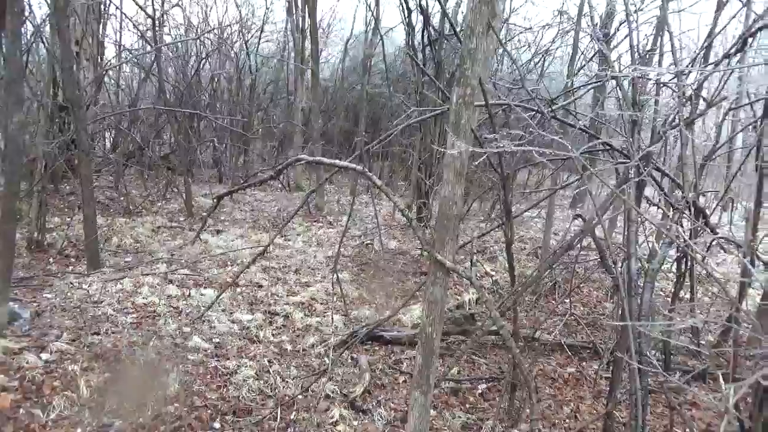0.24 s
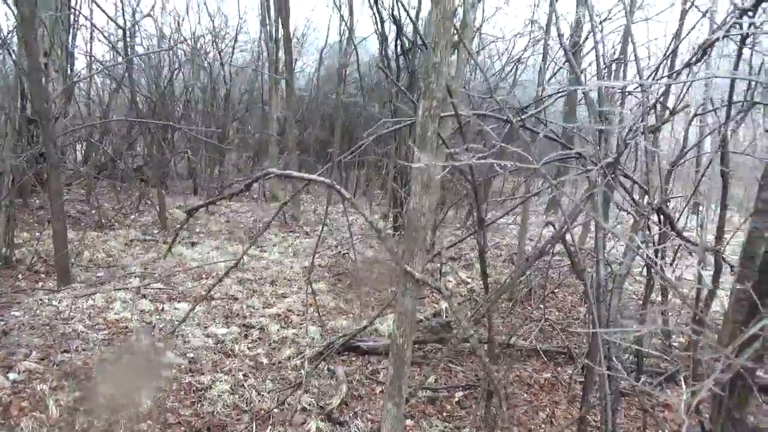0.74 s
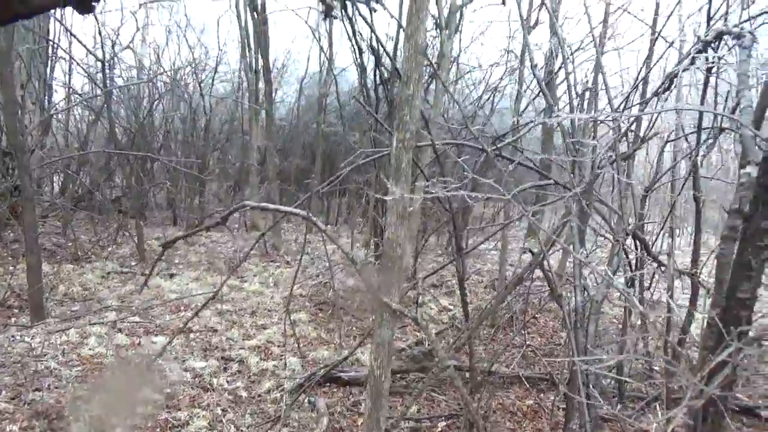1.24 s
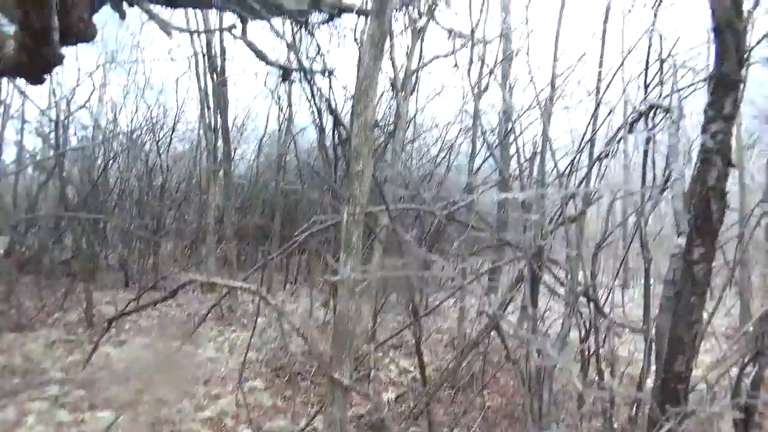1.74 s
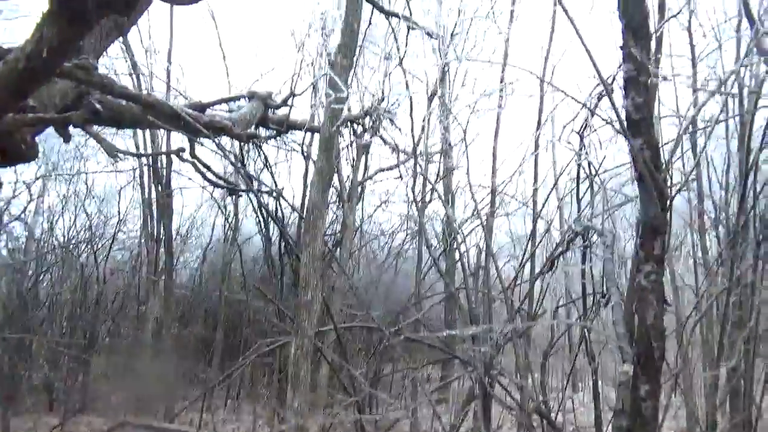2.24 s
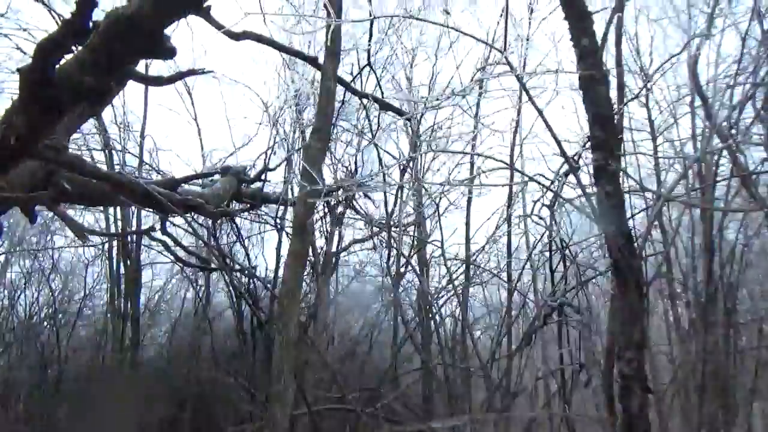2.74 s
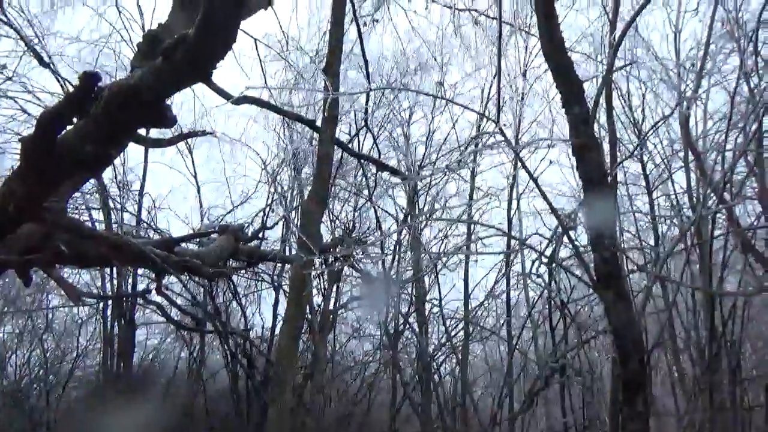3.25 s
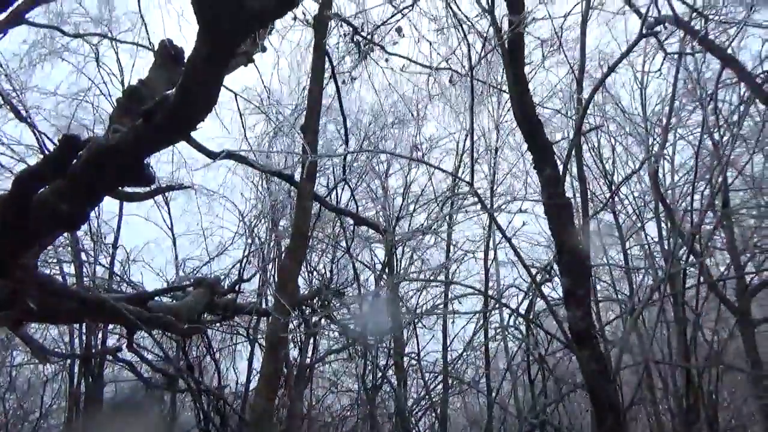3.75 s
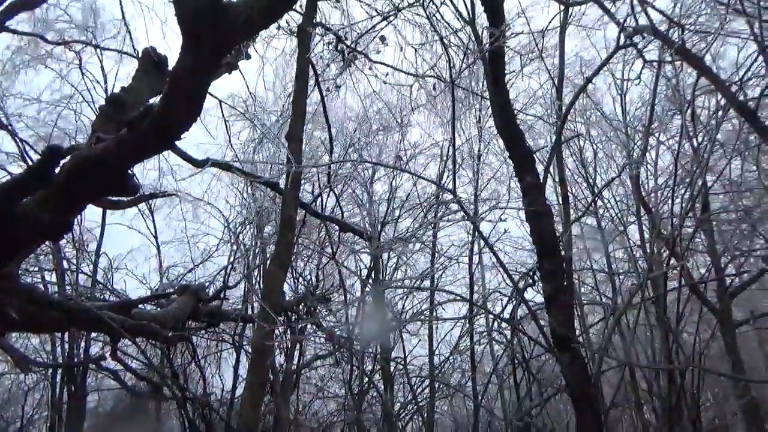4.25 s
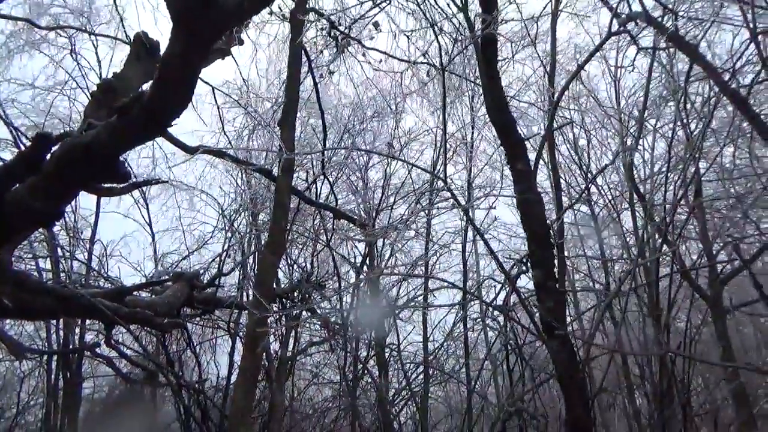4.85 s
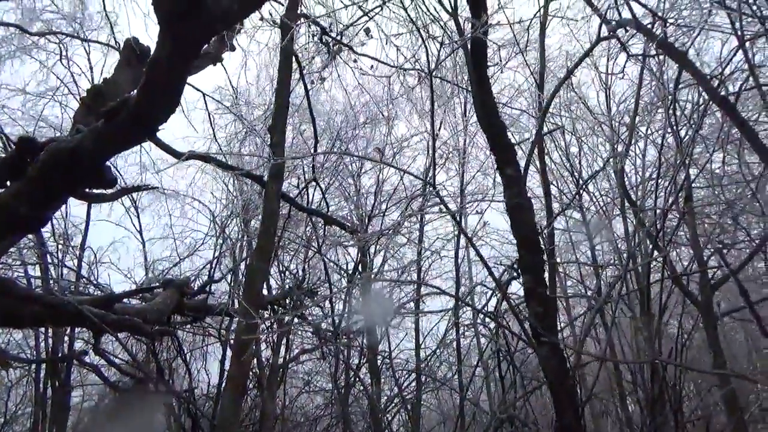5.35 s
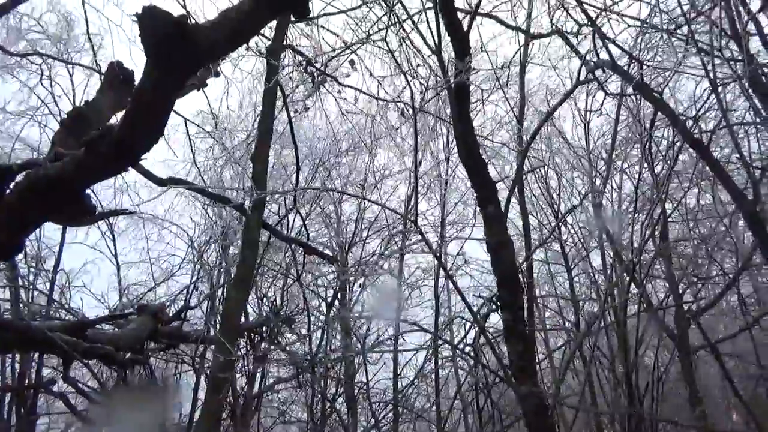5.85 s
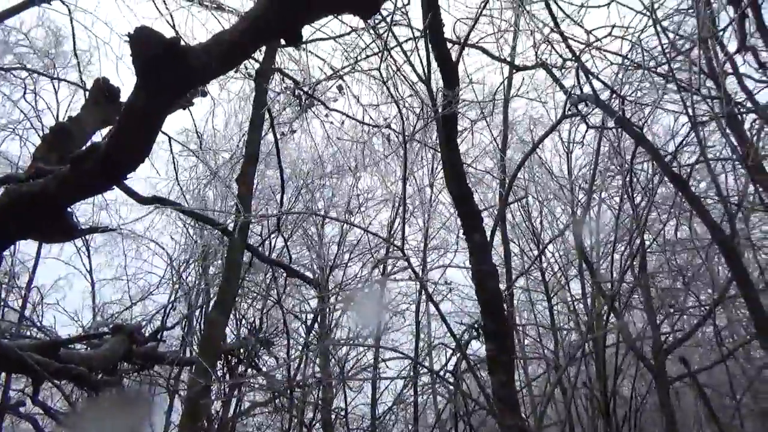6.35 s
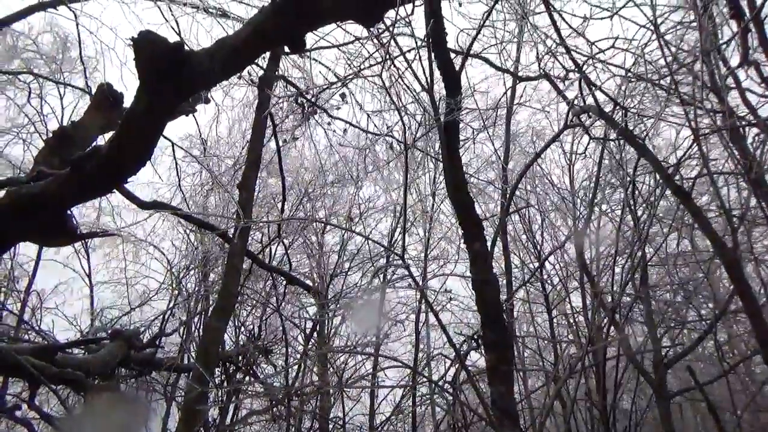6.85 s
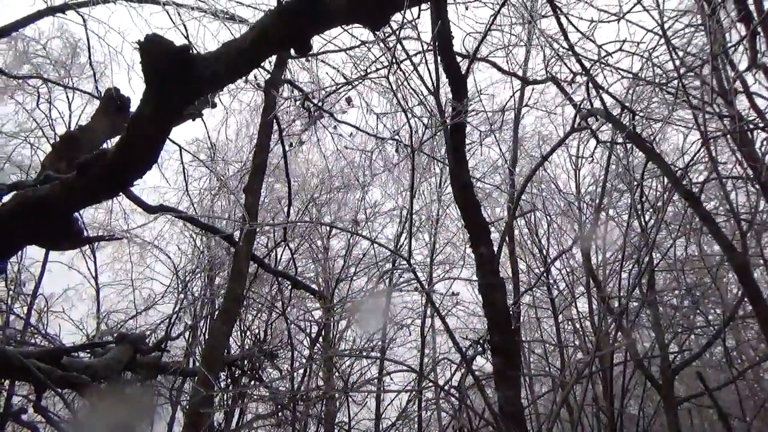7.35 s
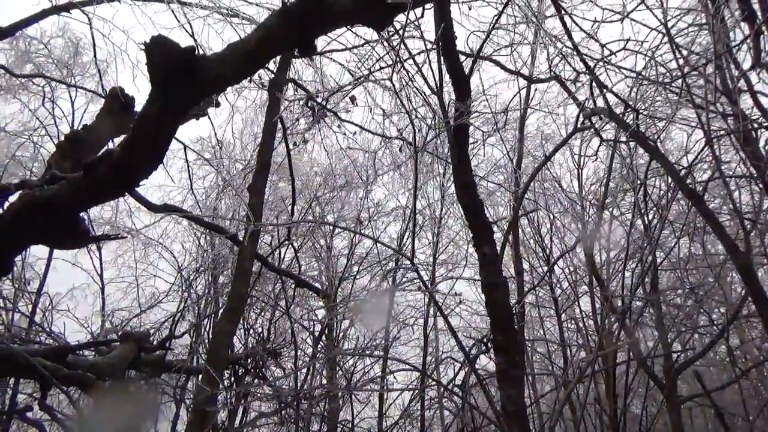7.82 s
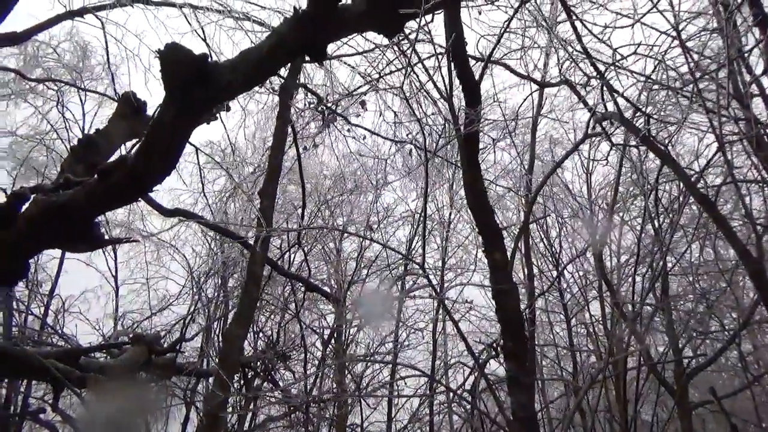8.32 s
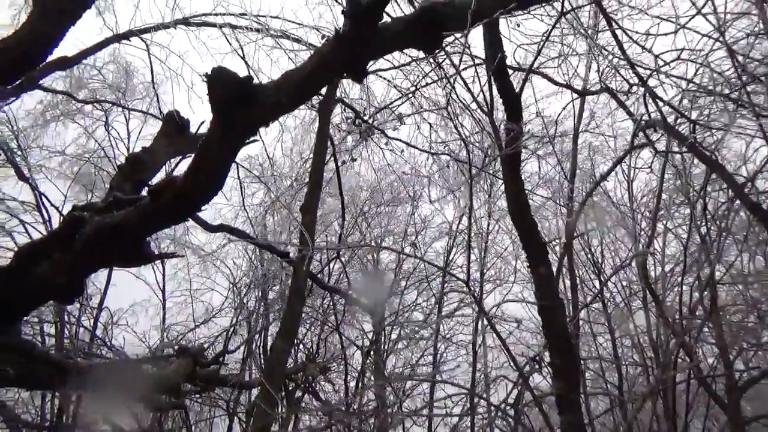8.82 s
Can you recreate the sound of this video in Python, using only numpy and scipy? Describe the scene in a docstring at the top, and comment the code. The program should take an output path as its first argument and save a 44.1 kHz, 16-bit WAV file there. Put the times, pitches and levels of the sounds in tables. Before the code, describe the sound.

Freezing rain hisses steadily in a bare wood, with sharp close drops ticking on icy twigs and dead leaves.

```python
"""A bare wood in freezing rain: countless drops hiss and patter on iced twigs and dead leaves.
Each hit is a tiny, fast-fading pulse; the far ones blur into noise. Near drops tick sharply amid short
bursts of spray, a few heavy ones knock on wood, others set a twig ringing, and the trunks scatter these
near sounds. Underneath lie a distant rumble, a faint hum, and light air and bumps on the microphone."""
import sys
import numpy as np
from scipy import signal
from scipy.fft import rfft, irfft, next_fast_len
from scipy.io import wavfile
from scipy.ndimage import map_coordinates

SR = 44100
rng = np.random.default_rng(int(sys.argv[2]) if len(sys.argv) > 2 else 0)


def store_pcm(level_fs):
    """Save levels as 16-bit WAV."""
    pcm = np.round(np.clip(level_fs, -1, 1) * 32767).astype(np.int16)
    wavfile.write(sys.argv[1], SR, np.atleast_2d(pcm).T)


N = 400428

# Slow changes. Pan is left minus right, so a positive pan leans left.
RAIN_STRENGTH = [(0.0, -39.5), (0.93, -39.5), (1.06, -39.5), (1.97, -38.5), (2.2, -40.5), (2.63, -39),
                 (3.19, -39.5), (3.84, -43), (4.81, -38.5), (4.98, -40.5), (5.99, -42), (6.22, -41),
                 (6.45, -43.5), (6.65, -43.5), (7.23, -40.5), (7.66, -43.5), (8.52, -40), (9.08, -40)]  # how hard it rains: t/s, level/dB
RAIN_PAN = [(0, -0.3), (2.5, -.4), (5, -1), (6.5, 0), (7.3, 0.5), (9.08, .6)]  # the rain leans slightly right, later left: t/s, pan/dB
RUMBLE_STRENGTH = [(0.0, -53.5), (0.88, -51.5), (3.72, -53.5), (9.08, -53.5)]  # rise and fall of the rumble: t/s, level/dB
AIR_STRENGTH = [(0, -57.5), (3.3, -60.5), (3.8, -58.5), (4.5, -59.5), (4.9, -53), (5.5, -57), (6.2, -62.5),
                (7.4, -58.5), (7.9, -56.5), (9.08, -62)]  # rise and fall of the moving air: t/s, level/dB

# The tone of each noise, and how the wood spreads sound.
ICE_TONE = [(2000, -40), (4000, -9), (6000, -1.5), (7500, 1), (8800, 5), (9700, 4), (10500, 1.5),
            (11200, -10)]  # hiss on ice: f/Hz, level/dB
LEAF_TONE = [(200, -21), (500, -2), (1000, -2.5), (1700, 0.5), (3000, 1.5), (4500, 0), (7000, -3),
             (11000, -18)]  # patter on leaves: f/Hz, level/dB
RUMBLE_TONE = [(30, -31), (80, -3), (130, -0.5), (220, -1), (350, -4.5), (600, -8), (1200, -11.5),
               (3000, -44)]  # distant rumble: f/Hz, level/dB
AIR_TONE = [(10, -22), (25, -6), (50, -5), (80, -5), (130, -17), (300, -38)]  # air on the microphone: f/Hz, level/dB
EAR_LIKENESS = [(60, .98), (250, 0.95), (500, 0.83), (1000, 0.68), (2200, 0.56), (4500, 0.5), (8500, 0.8),
                (11000, 0.78)]  # how alike left and right are: f/Hz, likeness (1 = the same)
ECHO_FADE = [(200, 0.13), (2000, 0.24), (10000, 0.49)]  # echo from the trunks: f/Hz, time to fade by 60 dB/s

# short bursts of spray, some alone, some just after a drop's tick or knock: t/s, level/dB, f/Hz
SPRAY_BURSTS = [(.134, -31.5, 2800), (.18, -27, 5470), (0.233, -32, 3000), (.324, -31, 3000),
                (0.391, -24, 7560), (.449, -23, 5460), (0.739, -16, 7400), (0.924, -30.5, 2500),
                (1.07, -29, 3500), (1.541, -24, 8500), (2.103, -22, 8800), (2.396, -21, 8950),
                (2.462, -22.5, 7550), (2.79, -36.5, 2400), (3.98, -24.5, 8800), (4.26, -25.5, 9000),
                (4.457, -23, 9200), (4.785, -37, 1100), (4.825, -25, 8500), (5.468, -27, 6000),
                (6.155, -25, 3750), (6.224, -36, 1000), (6.802, -33.5, 2700), (7.124, -30, 3200),
                (7.306, -27, 7500), (8.747, -26, 6500)]
NEAR_DROPS = [(.148, -20.5, 3800, -6), (.3196, -23, 3320, -11), (0.328, -17.5, 3270, -4),
              (0.4644, -17.5, 5100, -4), (.5933, -17, 3400, -6), (0.5998, -22.5, 1650, -3),
              (.6768, -11.5, 5800, -5), (.7201, -6, 8600, 0), (0.872, -22, 4100, -9),
              (.9111, -18, 4600, -5), (.965, -24, 2000, -5), (.9883, -18, 7200, -7),
              (1.038, -21.5, 2350, -5), (1.0839, -23, 5000, 2), (1.342, -13.5, 4570, -6),
              (1.3745, -19, 7850, -4), (1.6787, -19, 8300, -4), (1.8073, -20, 5850, -6),
              (1.8508, -20, 4650, -3), (1.9328, -21.5, 5750, -13), (1.9768, -12, 8000, -3),
              (2.0733, -11.5, 8400, -1), (2.1159, -13.5, 7250, -3), (2.3859, -13, 3300, -3),
              (2.4547, -21.5, 4200, -3), (2.7885, -19, 8500, -2), (3.2066, -20, 5600, 7),
              (3.5371, -18.5, 8000, 3), (3.795, -19, 7750, 10), (3.9775, -20.5, 8900, 1),
              (4.3124, -18.5, 8400, 2), (4.8196, -13.5, 8800, 6), (6.3183, -20.5, 2700, -4),
              (7.0648, -21.5, 5000, -7), (7.306, -19, 8600, 3), (7.702, -18.5, 9000, 3),
              (8.063, -22, 8900, -3), (8.2936, -21, 8800, 23), (8.3842, -20, 3220, 3),
              (8.5447, -25, 2760, 1), (8.747, -18, 8560, 1)]  # drops that tick close by: t/s, level/dB, f/Hz, pan/dB
# big drops on wood: t/s, level/dB, slap f/Hz, wood f/Hz, splatter level/dB, pan/dB
HEAVY_DROPS = [(.7197, -20, 1400, 810, -41, 0), (.7505, -22, 845, 180, -27, 0),
               (2.4972, -20, 1060, 160, -33, 9), (6.2111, -18, 1100, 485, -43, -10)]
TWIG_HITS = [(1.31, -31.5, 1620), (1.348, -34.5, 1600), (1.468, -31.5, 1360), (7.908, -26, 5930),
             (8.3252, -21.5, 5100)]  # drops that set a thin twig ringing: t/s, level/dB, f/Hz
SOFT_BUMPS = [(2.645, -39, 65), (4.539, -36, 70), (5.461, -34, 106), (7.72, -28.5, 38), (7.981, -39, 40),
              (8.235, -43, 42)]  # air and hand on the microphone: t/s, level/dB, f/Hz

TOP_HZ = 11150  # upper limit of the treble


def amp(db):
    """Turn decibels into a number to multiply by."""
    return 10 ** (np.asarray(db) / 20)


def unit(x):
    """Scale x to an average (rms) level of 1."""
    return x / np.sqrt(np.mean(x ** 2) + 1e-20)


def at_pitch(table, hz):
    """Read a table of (f/Hz, value) between its rows, on a log pitch scale."""
    pitches, values = np.transpose(table)
    return np.interp(np.log(hz + 1), np.log(pitches + 1), values)


def over_time(table):
    """Turn a table of (t/s, value) into one value per sample."""
    return np.interp(np.arange(N) / SR, *np.transpose(table))


def wobble(rate):
    """A smooth curve through `rate` random points a second."""
    return map_coordinates(rng.standard_normal(int(N * rate / SR) + 4), [np.arange(N) * rate / SR])


def filtered(x, gain):
    """Turn each frequency in x up or down by gain(hz)."""
    size = next_fast_len(N + SR // 2)
    return irfft(rfft(x, size) * gain(np.fft.rfftfreq(size, 1 / SR)), size)[..., :N]


def rush(tone):
    """Noise from all around: one part is shared by both ears, the other is opposite in each."""
    def gain(hz):
        width = np.arccos(np.clip(at_pitch(EAR_LIKENESS, hz), -1, 1)) / 2
        return amp(at_pitch(tone, hz)) * [np.cos(width), np.sin(width)]
    shared, opposite = filtered(rng.standard_normal((2, N)), gain)
    return unit(np.array([shared + opposite, shared - opposite]))


def impacts(t, db, hz, cycles, pan_db, size):
    """Each hit swells for `cycles` waves of its pitch, then dies away; it is `size` samples long."""
    t, db, hz, cycles, pan_db = [v[:, None] for v in np.broadcast_arrays(t, db, hz, cycles, pan_db)]
    samples = np.maximum(t * SR, 0).astype(int) + np.arange(size)
    age = np.maximum(samples / SR - t, 0) * hz / cycles  # 1 at the top of the swell
    turn = 2 * np.pi * cycles
    # the arctan shift balances push and pull, so a hit moves no air overall
    pulse = amp(db) * age * np.exp(1 - age) * np.sin(turn * age - 2 * np.arctan(turn))
    left = 2 / (1 + amp(-pan_db))
    return np.array([np.bincount(samples.ravel(), (pulse * g).ravel(), N)[:N] for g in (left, 2 - left)])


def ring_cycles(hz):
    """Wood gives a hollow tap, wet leaves a dead snap; the highest ticks, near 9 kHz, ring a little."""
    return at_pitch([(2200, 0.48), (4000, 0.37), (5800, 0.37), (8500, 0.78)], hz)


def shower(count, pitch_hz, spread, scatter_db, closest):
    """Drops land at random moments, most of them far and faint, a few closer."""
    when, area = rng.random((2, count))
    pitch, side = rng.standard_normal((2, count))
    hz = np.clip(pitch_hz * np.exp(spread * pitch), 200, TOP_HZ)
    # a soft landing spreads the same energy over a longer, lower pulse
    db = -scatter_db * np.log(area + closest) + 10 * np.log10(hz / pitch_hz)
    return unit(impacts(when * N / SR, db, hz, ring_cycles(hz), 5.8 * side, size=96))


def rain():
    """Far drops blur into hiss; closer ones stand out as tiny taps and come in flurries."""
    strength_db = over_time(RAIN_STRENGTH)
    mean_db = strength_db.mean()
    ice_db = strength_db - 2 + 0.3 * wobble(7.3)
    leaf_db = mean_db - 3.5 + 0.57 * (strength_db - mean_db)  # the leaves swing less than the ice
    flurry = 0.6 * wobble(9) + 0.7 * wobble(35)
    hiss = amp(ice_db + 1.1 * flurry) * rush(ICE_TONE) + amp(leaf_db + 0.85 * flurry) * rush(LEAF_TONE)
    fizz_gain = amp(ice_db - 7.5 + 2 * flurry + 1.9 * wobble(50))
    fizz = fizz_gain * shower(14000, pitch_hz=8600, spread=0.045, scatter_db=4.5, closest=0.006)
    patter_gain = amp(leaf_db - 6.5 + flurry + 1.84 * wobble(40))
    patter = patter_gain * shower(9000, pitch_hz=2850, spread=0.44, scatter_db=4, closest=0.029)
    # a thin fall of pellets prickles on the nearest twigs
    prickle = amp(ice_db - 12.5) * shower(420, pitch_hz=6960, spread=0.19, scatter_db=5.5, closest=0.045)
    pan_db = over_time(RAIN_PAN)
    return (hiss + fizz + patter + prickle) * amp([pan_db / 2, -pan_db / 2])


def hum(hz=112.2, db=-63):
    """One faint, low note that wavers in loudness and pitch."""
    loudness = 1 + 0.24 * wobble(5)
    phase = 2 * np.pi * hz * np.arange(N) / SR + 1.06 * wobble(12)
    return amp(db) * unit(loudness * np.sin(phase))


def rumble():
    """Low noise from far away that gently rises and falls."""
    return amp(over_time(RUMBLE_STRENGTH) + 1.5 + 0.9 * wobble(3.5)) * rush(RUMBLE_TONE)


def moving_air():
    """Light air pushes unevenly on the microphone and makes a deep flutter."""
    return amp(over_time(AIR_STRENGTH) + 2.5 + 1.3 * wobble(6.3)) * rush(AIR_TONE)


def sprays(t, db, pitch_hz, count=110, spread=0.29, flight_s=0.017):
    """A bursting drop throws fine droplets that land close together, then thin out and fade."""
    t, db, pitch_hz = np.repeat([t, db, pitch_hz], count, axis=1)
    x, y, pitch, loudness, side = rng.standard_normal((len(t), 5)).T
    distance = 0.55 * np.hypot(x, y)
    hz = np.clip(pitch_hz * np.exp(spread * pitch), 100, TOP_HZ)
    droplet_db = db - 9.5 - 3 * distance + loudness
    return impacts(t + flight_s * distance, droplet_db, hz, ring_cycles(hz), 4 * side - 1.5, size=384)


def trunk_echo(sound):
    """The trunks scatter a sound into a thin tail whose low notes die first."""
    hz, t, noise = signal.stft(rng.standard_normal((2, SR // 2)), SR, nperseg=256)
    fade = amp(-60 * t / at_pitch(ECHO_FADE, hz)[:, None])
    tail = signal.istft(noise * fade, SR, nperseg=256)[1]
    return signal.fftconvolve(sound, tail / np.linalg.norm(tail[0]), axes=1)[:, :N]


def ticks(drops, echo_count=10, echo_s=0.0017):
    """A near drop makes a sharp pulse and a little spray; twigs and leaves echo it almost at once."""
    t, db, hz, pan_db = drops.T
    start = t - ring_cycles(hz) / hz
    pulse = impacts(start, db + 0.6, hz, ring_cycles(hz), pan_db, size=256)
    spray = sprays(t, db - 14.5, 1.15 * hz, count=60)
    crack = impacts(start - 0.0002, db - 7, hz=4500, cycles=0.083, pan_db=pan_db, size=64)  # first touch
    t, db, hz, pan_db = np.repeat(drops, echo_count, axis=0).T
    x, y, side = rng.standard_normal((len(t), 3)).T
    path = 0.18 + (x ** 2 + y ** 2) / 2  # a longer path makes a later, fainter echo
    echoes = impacts(t + echo_s * path, db - 16 - 1.9 * path, hz, ring_cycles(hz), pan_db + 5 * side, 256)
    return pulse + spray + crack + echoes


def stray_drops(count=26, pitch_hz=5700):
    """Rows like NEAR_DROPS for random drops a little farther off, louder when it rains harder."""
    t = rng.random(count) * N / SR
    loudness, pitch, side = rng.standard_normal((count, 3)).T
    when, strength_db = np.transpose(RAIN_STRENGTH)
    db = -25.5 + 0.5 * loudness + np.interp(t, when, strength_db - strength_db.mean())
    hz = np.minimum(pitch_hz * np.exp(0.4 * pitch), TOP_HZ)
    return np.column_stack([t, db, hz, 4 * side])


def knocks(slap_cycles=0.27, thud_swell_s=0.0011, bounce_s=0.0066):
    """A heavy drop slaps the wood, which thuds; the drop bounces once amid a dull splatter."""
    t, db, slap_hz, wood_hz, splatter_db, pan_db = np.transpose(HEAVY_DROPS)
    slap = impacts(t, db, slap_hz, slap_cycles, pan_db, size=512)
    thud = impacts(t + 0.0011, db - 9.5, wood_hz, thud_swell_s * wood_hz, pan_db=0, size=2048)
    bounce = impacts(t + bounce_s, db - 12.5, 0.56 * slap_hz, slap_cycles, pan_db, size=512)
    splatter = sprays(t - 0.006, splatter_db, 1.66 * slap_hz, spread=0.54)
    return slap + thud + bounce + splatter


def twig_pings():
    """A thin twig, struck by a drop, rings briefly on one note."""
    return impacts(*np.transpose(TWIG_HITS), cycles=1.6, pan_db=-2, size=1024)


def bumps():
    """Air or a hand gives the microphone a slow, soft push, the same on both sides."""
    return impacts(*np.transpose(SOFT_BUMPS), cycles=0.3, pan_db=0, size=8192)


def scene():
    """Near drops and their echoes in the steady rain, with the low sounds underneath."""
    drops = np.vstack([NEAR_DROPS, stray_drops()])
    near = ticks(drops) + knocks() + twig_pings() + sprays(*np.transpose(SPRAY_BURSTS))
    return near + amp(-4.5) * trunk_echo(near) + rain() + hum() + rumble() + moving_air() + bumps()


def record(dry):
    """Cut away the treble above TOP_HZ."""
    return filtered(dry, lambda hz: 1 / np.sqrt(1 + (hz / TOP_HZ) ** 400))


dry = scene()
out = record(dry)
store_pcm(out)
```